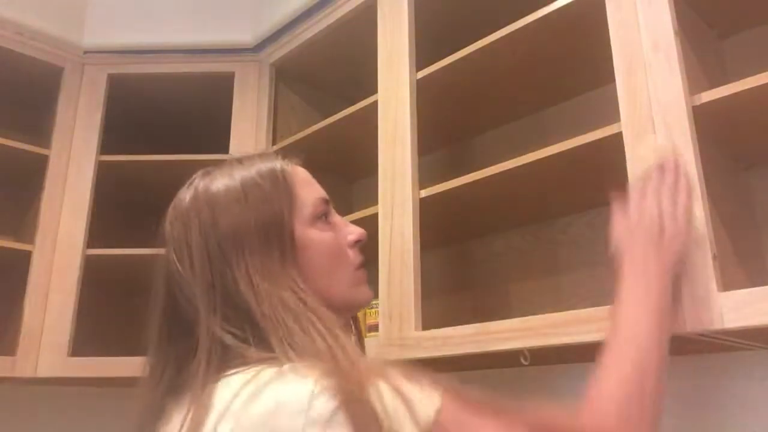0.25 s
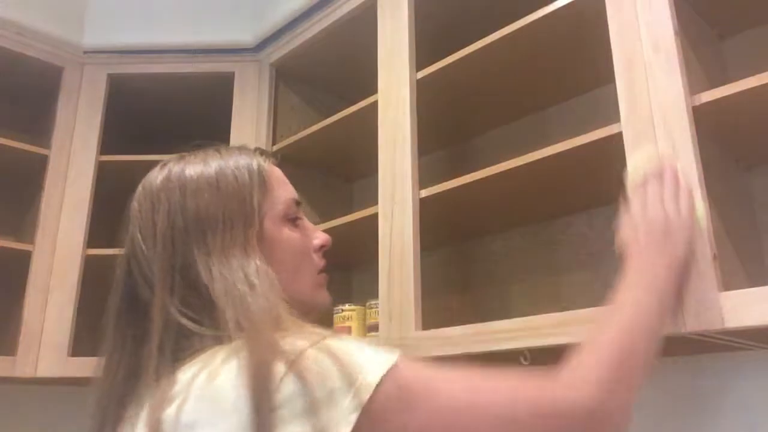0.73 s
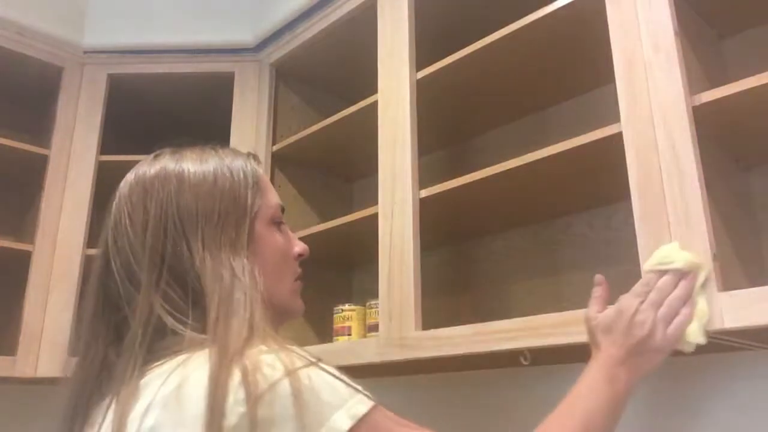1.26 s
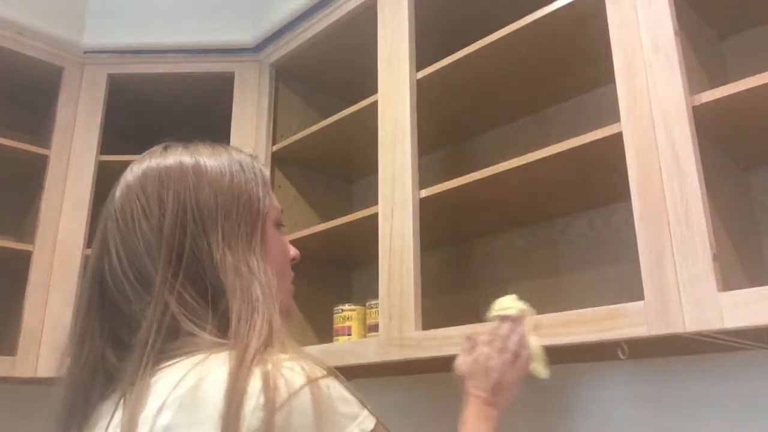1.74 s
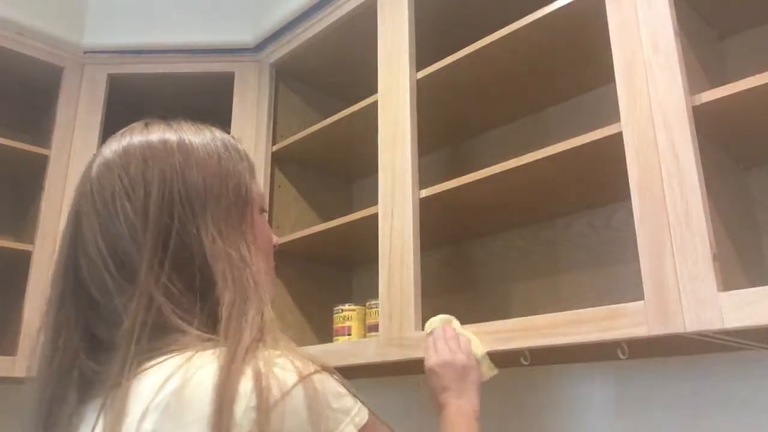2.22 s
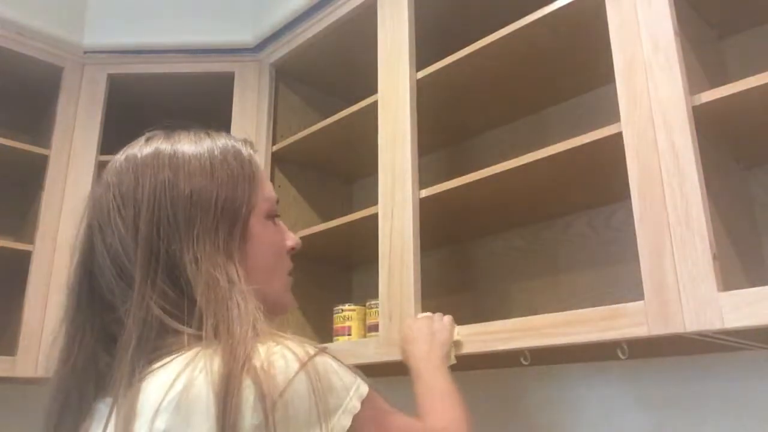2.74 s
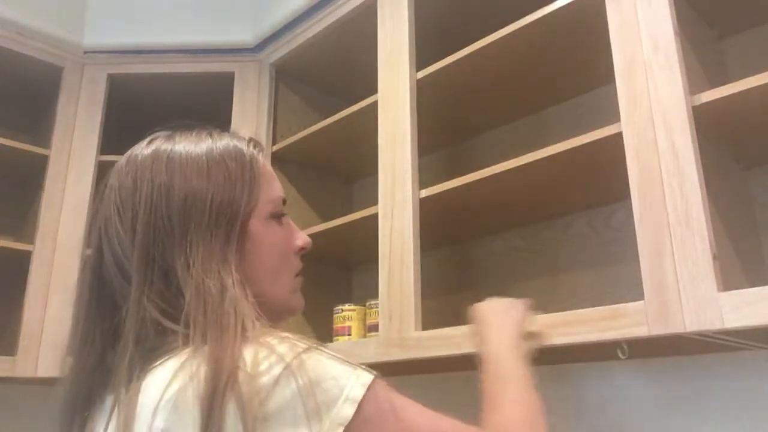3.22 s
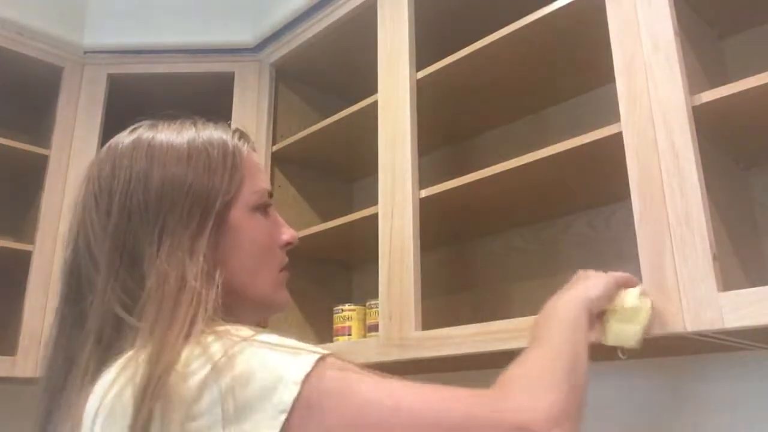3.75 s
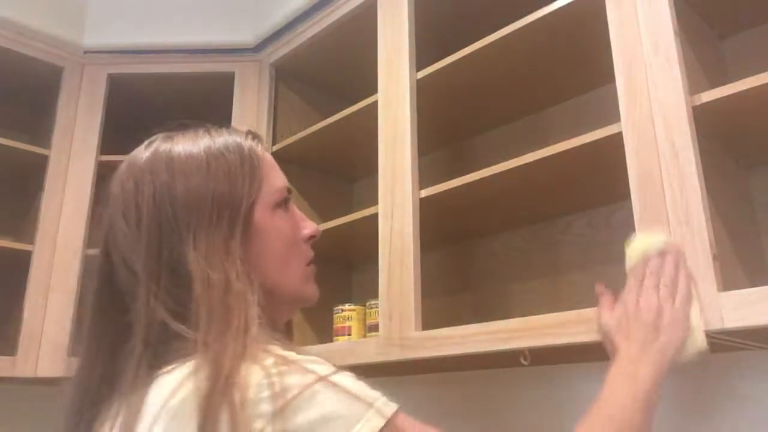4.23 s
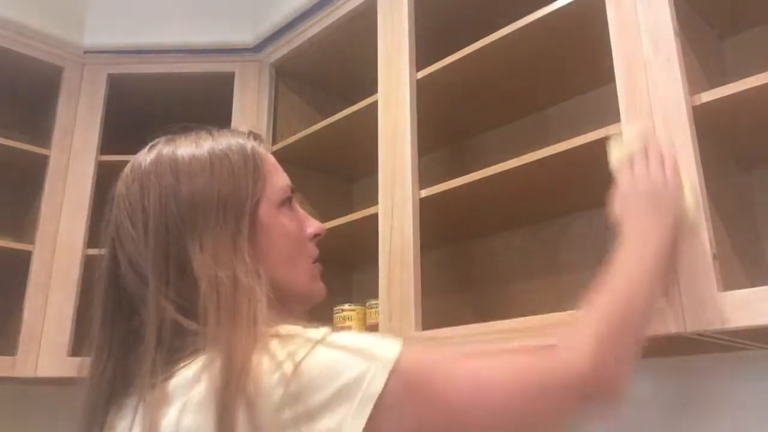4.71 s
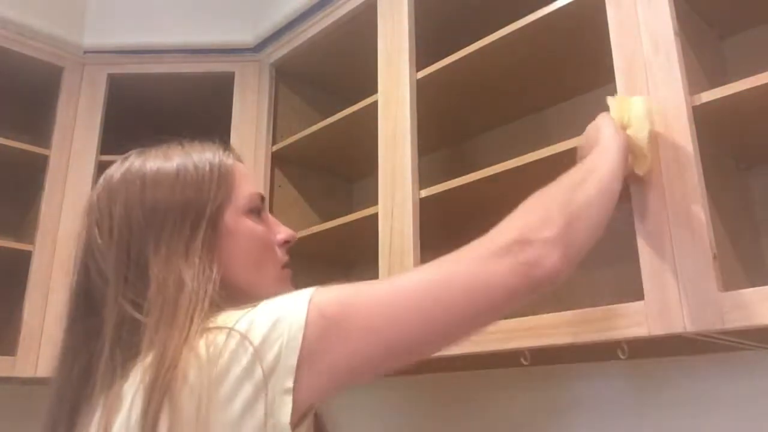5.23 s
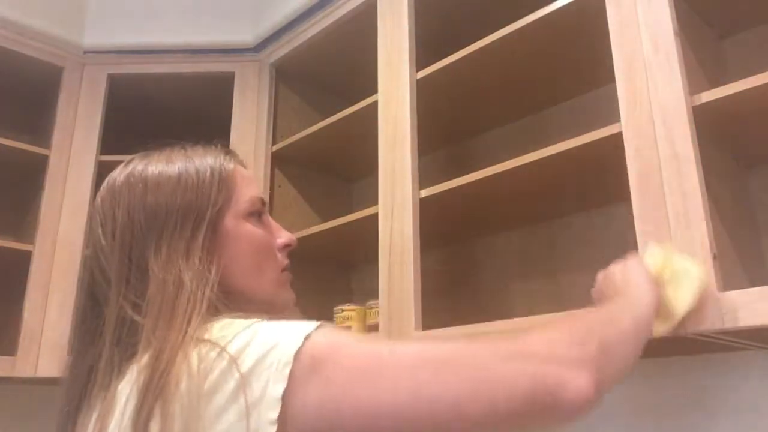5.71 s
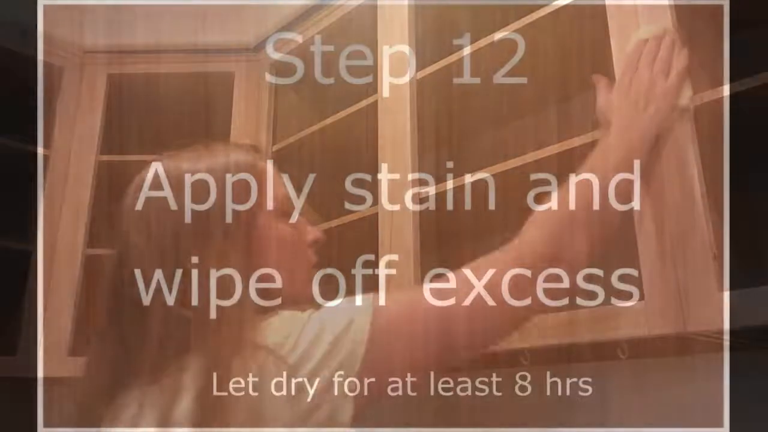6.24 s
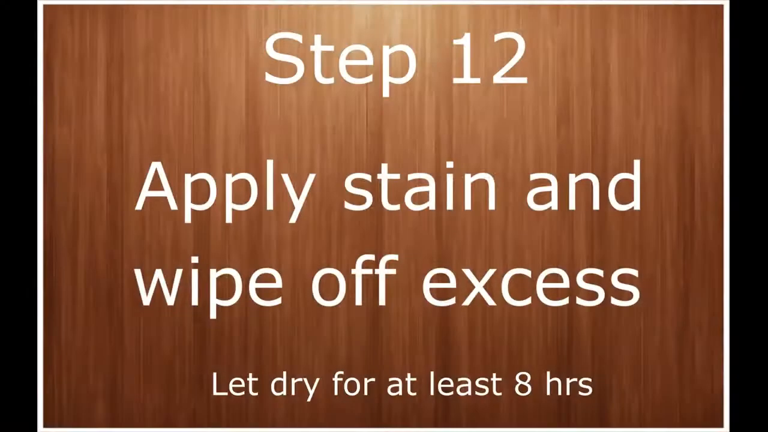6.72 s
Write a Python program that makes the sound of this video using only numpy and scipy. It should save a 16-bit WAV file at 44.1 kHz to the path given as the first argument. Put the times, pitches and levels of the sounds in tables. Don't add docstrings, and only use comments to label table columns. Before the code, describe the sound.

Dry, soft, hissing rubs of cloth on bare wood, some short and some longer, are heard close to a single microphone in a small room. Knuckle knocks and brief rattling scuffs punctuate the start and the two-second area; later ones are fainter. A few tiny metallic clicks stand out. Beneath it all runs a low, slightly uneven ventilation rumble and hum, until the sound is suddenly cut to near silence at the end.

```python
import sys
import numpy as np
from scipy import signal
from scipy.fft import rfft, irfft, dct, next_fast_len
from scipy.io import wavfile
from scipy.ndimage import uniform_filter1d, map_coordinates

SR = 44100
rng = np.random.default_rng(int(sys.argv[2]) if len(sys.argv) > 2 else 0)


def gain_from_decibels(decibels):
    exponent = np.asarray(decibels, float) / 20
    return 10 ** exponent


def generate_wav(sig):
    pcm = np.round(np.clip(np.atleast_2d(sig).T, -1, 1) * 32767).astype(np.int16)
    wavfile.write(sys.argv[1], SR, pcm)


N = 307039

# f/Hz, density/dB
AIR_SPECTRUM = [(260, -21.5), (450, -2), (661, -4), (1200, -7), (1370, -13), (1810, -11), (1980, -14),
                (2290, -15.5), (5030, -40.5), (6280, -27), (12600, -68.5), (15500, -61.5)]
# f/Hz, width/Hz, level/dB
ROOM_MODES = [(32, 20, -21), (54.6, 8.1, -4), (85, 14, -10.5), (109.5, 5.5, -2.5), (119.8, 14, -2.5),
              (125, 8.8, -15), (145.7, 20, -8.5), (194.9, 26.4, -3.5), (218.3, 22, -9), (265, 4.9, -13.5),
              (324, 23, -12), (336, 16, -9), (350, 7.9, -9.5), (387.6, 10.4, -11), (530.3, 21, -18.5)]
# t/s, level/dB
RUMBLE_LEVEL = [(0.0, -48), (0.1, -47), (0.12, -47), (2.34, -46.5), (2.36, -53.5), (2.6, -44), (2.72, -48.5),
                (4.5, -46), (4.79, -49.5), (4.84, -45.5), (6.08, -47.5), (6.27, -46.5)]
# f/Hz, t60/s
KITCHEN_T60 = [(1000, 0.68), (3000, 0.12), (10000, 0.16)]
# t/s, f/Hz (centre), level/dB
SIDE_BURSTS = [(.42, 5700, -70), (.465, 4660, -71), (.79, 9100, -66), (.79, 6300, -69), (.885, 7400, -67),
               (1.28, 5830, -77), (1.555, 5300, -66.5), (1.605, 4970, -66), (1.65, 7000, -68),
               (1.815, 7740, -65), (2.53, 8700, -77), (2.905, 14500, -88), (4.37, 13200, -74),
               (4.37, 7600, -70), (4.44, 4580, -75), (4.785, 9400, -66), (4.785, 6400, -70),
               (4.785, 4700, -76.5), (4.81, 10400, -69), (4.81, 13100, -69)]
# f/Hz, width/Hz, depth (0 to 1)
PORT_DIPS = [(4920, 330, .3), (8500, 500, .15), (10480, 560, 0.4)]
# f/Hz, level/dB
CONTACT_RADIATION = [(700, -40), (1300, 0)]
# t/s, wood level/dB, wood f/Hz, snap level/dB
KNOCKS = [(.0455, -31, 2830, -31.5), (.2279, -34, 2100, -40.5), (.3217, -43.5, 2240, -51.5),
          (1.9406, -33.5, 2380, -36.5), (1.9968, -29.5, 2300, -40.5), (2.163, -31.5, 2390, -37.5),
          (2.5649, -35, 2600, -39), (2.617, -43, 2680, -60), (2.9487, -46, 2550, -61),
          (3.0158, -43, 2300, -48), (3.2335, -44, 1870, -58.5), (3.3524, -47, 3000, -55.5),
          (5.3186, -41.5, 2000, -48.5), (5.4277, -48, 2650, -51.5), (5.5362, -44.5, 1900, -57),
          (5.7648, -40.5, 2500, -54), (5.8945, -38.5, 2880, -48.5)]
# t/s, wood level/dB, wood f/Hz, snap level/dB
SCUFFS = [(.0477, -37.5, 2500, -35), (.05, -40, 4200, -59.5), (.186, -42, 2290, -53),
          (.231, -45.5, 2200, -44), (2.001, -43, 2400, -52), (5.0744, -43.5, 1950, -71.5),
          (2.0852, -43.5, 3270, -47), (2.165, -37.5, 2385, -39), (2.1695, -35.5, 2316, -39.5),
          (5.1427, -47.5, 2440, -58), (5.222, -47, 3100, -53), (5.3742, -44.5, 2100, -63),
          (5.898, -41.5, 2290, -54), (2.301, -47, 3400, -51), (5.095, -47, 1900, -66.5)]
# t/s, wood level/dB, snap level/dB, snap f/Hz
HOOKS = [
    (1.101, -49, -33.5, 10300),
    (2.2155, -58, -51, 9500),
    (2.2334, -56, -37.5, 9470),
    (2.298, -41.5, -38.5, 9470),
    (3.666, -60, -50.5, 11900),
]
# f/Hz, density/dB
FIBRE_SPECTRUM = [(2500, -12.5), (4200, -1.5), (5500, -2.5), (7500, 0.5), (9300, 0), (11500, -1.5),
                  (14000, -5), (15500, -10)]
# f/Hz, density/dB
PANEL_SPECTRUM = [(700, -13), (1400, 0.5), (2000, -2.5), (2600, -2), (3500, -2.5), (4500, -9),
                  (6000, -11.5), (9000, -25)]
# t/s (start), length/s, fibre level/dB, panel level/dB
STROKES = [(0.042, 0.024, -57, -53), (.205, .15, -56, -54.5), (.36, .18, -57, -59),
           (.67, 0.32, -57.5, -60.5), (1.0, 0.076, -64, -69), (1.12, .1, -67, -65),
           (1.383, 0.37, -57.5, -56), (1.86, 0.088, -55.5, -54.5), (2.168, 0.053, -62.5, -54.5),
           (2.325, 0.013, -62, -57), (2.55, 0.07, -72.5, -62.5), (2.78, 0.33, -69.5, -63),
           (3.06, 0.074, -61, -55.5), (3.19, .04, -65, -59.5), (3.273, 0.12, -57.5, -54),
           (3.39, 0.15, -59.5, -56), (3.873, .015, -59, -53), (3.94, 0.1, -69, -62.5),
           (4.134, 0.068, -68, -61), (4.308, .09, -61.5, -60.5), (4.42, .2, -59, -61),
           (4.73, 0.25, -58, -59.5), (5.08, .03, -73.5, -60.5), (5.19, .1, -67, -60),
           (5.33, 0.044, -73, -60.5), (5.545, .16, -59, -57), (5.91, 0.015, -65, -58),
           (5.98, 0.11, -72, -62.5), (6.17, .05, -66, -64.5), (6.231, .06, -64, -62)]
# t/s (start), length/s, fibre level/dB, panel level/dB
SHIFTS = [
    (.12, .04, -65.5, -58),
    (1.32, .02, -65, -62),
    (1.772, .06, -59.5, -57),
    (2.06, .07, -68, -61.5),
    (2.25, 0.036, -67.5, -64),
    (3.004, .03, -65.5, -57.5),
    (3.68, .12, -71.5, -64.5),
    (5.458, .03, -70, -63),
    (5.72, 0.076, -61.5, -57),
    (4.243, .04, -65.5, -60.5),
]


def unit(x):
    return x / np.sqrt(np.mean(x ** 2) + 1e-20)


def along(points, hz):
    f, value = np.transpose(points)
    return np.interp(np.log(hz + 1), np.log(f + 1), value)


def wobble(rate):
    knots = rng.standard_normal(int(N * rate / SR) + 4)
    return map_coordinates(knots, [np.arange(N) * rate / SR])


def filtered(x, response):
    m = next_fast_len(N + SR // 2)
    hz = np.fft.rfftfreq(m, 1 / SR)
    return irfft(rfft(x, m) * response(hz), m)[..., :N]


def resonance(hz, centre_hz, width_hz):
    damping = 1j * hz * width_hz
    return damping / (centre_hz ** 2 - hz ** 2 + damping)


def patchy(patchy_db):
    z = signal.stft(rng.standard_normal(N + 512), nperseg=512)[2]
    field = uniform_filter1d(rng.standard_normal(z.shape), size=6, axis=0)
    field = uniform_filter1d(field, size=10, axis=1)
    return signal.istft(z * gain_from_decibels(patchy_db * unit(field)), nperseg=512)[1][:N]


def ventilation():
    t = np.arange(N) / SR

    def roar_response(hz):
        power = 0
        for centre_hz, width_hz, db in ROOM_MODES:
            gain = np.abs(resonance(hz, centre_hz, width_hz))
            power = power + gain_from_decibels(db) ** 2 * (gain ** 4 + gain ** 2)
        return np.sqrt(power) * hz ** 2 / (hz ** 2 + 22 ** 2)

    roar = unit(filtered(rng.standard_normal(N), roar_response))
    hiss = unit(filtered(patchy(patchy_db=1.5), lambda hz: gain_from_decibels(along(AIR_SPECTRUM, hz))))
    hiss_db = -57 + 0.6 * wobble(3)
    hum_db = -52 + 1.8 * wobble(5)
    hum = gain_from_decibels(hum_db) * np.sin(2 * np.pi * 119.6 * t + 0.5 * wobble(4))
    roar_db = np.interp(t, *np.transpose(RUMBLE_LEVEL)) + 1.5 + 0.81 * wobble(7.2)
    return gain_from_decibels(roar_db) * roar + hum + gain_from_decibels(hiss_db) * hiss


def side_bursts():
    block, offset, band_hz = 1024, 159, 1500
    out = np.zeros(N + SR)
    window = signal.windows.kaiser_bessel_derived(2 * block, 4 * np.pi)
    hz = (np.arange(block) + 0.5) * SR / (2 * block)
    for s, centre_hz, db in SIDE_BURSTS:
        lines = rng.standard_normal(block) * (np.abs(hz - centre_hz) < band_hz / 2)
        a, b = np.split(unit(dct(lines, type=4)), 2)
        unfolded = np.concatenate([b, -b[::-1], -a[::-1], -a])
        start = offset + block * (round((s * SR - offset) / block) - 1)
        out[start:][:2 * block] += gain_from_decibels(db) * window * unfolded
    return out[:N]


def kitchen(x):
    hz, t, z = signal.stft(rng.standard_normal(SR // 2), SR, nperseg=256)
    decay = gain_from_decibels(-60 * t / along(KITCHEN_T60, hz)[:, None])
    tail = signal.istft(z * decay, SR, nperseg=256)[1]
    delayed = np.pad(x, (90, 0))
    return signal.fftconvolve(delayed, tail / np.linalg.norm(tail))[:N]


def ticks():
    out, t = np.zeros(N + SR), np.arange(4096) / SR
    hz = np.fft.rfftfreq(len(t), 1 / SR)
    bending = np.exp(-0.7j * np.sqrt(hz))
    contacts = [(*row, 5500, 17) for row in KNOCKS]
    contacts += [(*row, 4800, 38) for row in SCUFFS]
    contacts += [(s, wood_db, 3450, snap_db, snap_hz, 8) for s, wood_db, snap_db, snap_hz in HOOKS]
    for s, wood_db, wood_hz, snap_db, snap_hz, t60_ms in contacts:
        blow = 14 * gain_from_decibels(-t60_ms / 4) * (t == 0)
        rattle = rng.standard_normal((2, len(t))) * gain_from_decibels(-60000 * t / t60_ms)
        force = rfft(blow + rattle) * bending
        mode_pair = resonance(hz, wood_hz, 900) - 0.4 * resonance(hz, 1.4 * wood_hz, 1300)
        wood = irfft(force[0] * mode_pair * resonance(hz, wood_hz, 4000) ** 2)
        snap = irfft(force[1] * resonance(hz, snap_hz, snap_hz) ** 3)
        both = gain_from_decibels(wood_db) * wood / np.abs(wood).max() + gain_from_decibels(snap_db) * snap / np.abs(snap).max()
        out[round((s - 0.0004) * SR):][:len(t)] += both
    return filtered(out[:N], lambda f: gain_from_decibels(along(CONTACT_RADIATION, f)))


def hand():
    speed_up, slow_down = 206, 168
    panel_follows = 0.65
    t = np.arange(0, N, 64) / SR
    start, length, fibre_db, panel_db = np.transpose(STROKES + SHIFTS)[..., None]
    slack_db = speed_up * np.clip(start - t, 0, None)
    slack_db = slack_db + slow_down * np.clip(t - start - length, 0, None)
    fibre = np.maximum((fibre_db - slack_db).max(axis=0), -74.5)
    panel = np.maximum((panel_db - panel_follows * slack_db).max(axis=0), -67)
    return [np.interp(np.arange(N) / SR, t, level) for level in (fibre, panel)]


def cloth():
    fibre_db, panel_db = hand()
    drag = wobble(25)
    catches = gain_from_decibels(0.5 * wobble(970)) * patchy(patchy_db=0.8)
    fibres = unit(filtered(catches, lambda hz: gain_from_decibels(along(FIBRE_SPECTRUM, hz))))
    sheen = filtered(fibres, lambda hz: 1 / (1 + (10500 / (hz + 1)) ** 6))
    sheen_db = 0.4 * (fibre_db + 57.5) + 0.45 * (fibre_db - panel_db)
    fibres = fibres + (gain_from_decibels(sheen_db) - 1) * sheen
    shaking = gain_from_decibels(0.98 * wobble(300)) * patchy(patchy_db=1.74)
    panel = unit(filtered(shaking, lambda hz: gain_from_decibels(along(PANEL_SPECTRUM, hz))))
    fibre_level = gain_from_decibels(fibre_db + 0.54 * drag)
    panel_level = gain_from_decibels(panel_db + 0.52 * drag + 0.69 * wobble(40))
    return fibre_level * fibres + panel_level * panel


def scene():
    hits = ticks()
    mono = ventilation() + hits + gain_from_decibels(-5.5) * kitchen(hits) + cloth()
    return np.array([mono, mono])


def top_cut(x):
    return signal.sosfilt(signal.butter(12, 16290, fs=SR, output="sos"), x)


def record(dry):
    def port(hz):
        loss = sum(depth * np.abs(resonance(hz, c, w)) ** 2 for c, w, depth in PORT_DIPS)
        return (1 - loss) * (hz < 15335)

    cut_s, fade_s = 6.278, 0.0012
    still_open = np.clip((cut_s - np.arange(N) / SR) / fade_s, 0, 1)
    mix = filtered(dry, port) * still_open + side_bursts() * [[1], [-1]]
    return top_cut(mix)


dry = scene()
out = record(dry)
generate_wav(out)
```